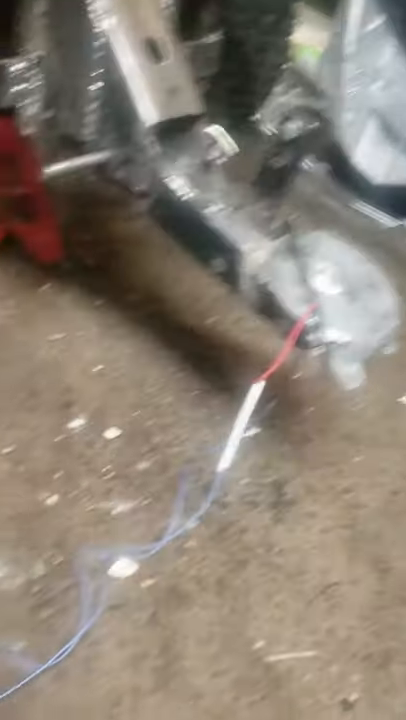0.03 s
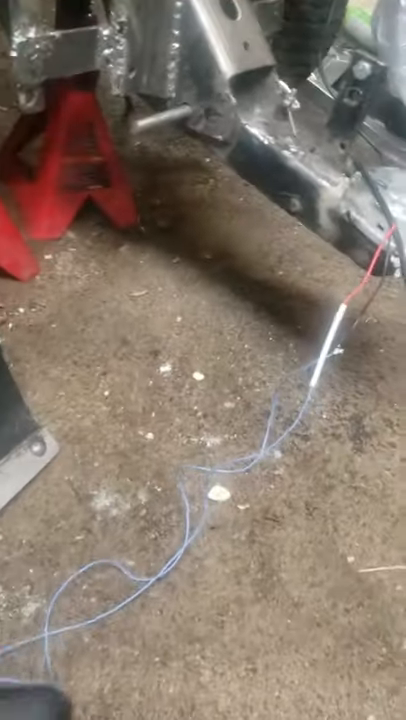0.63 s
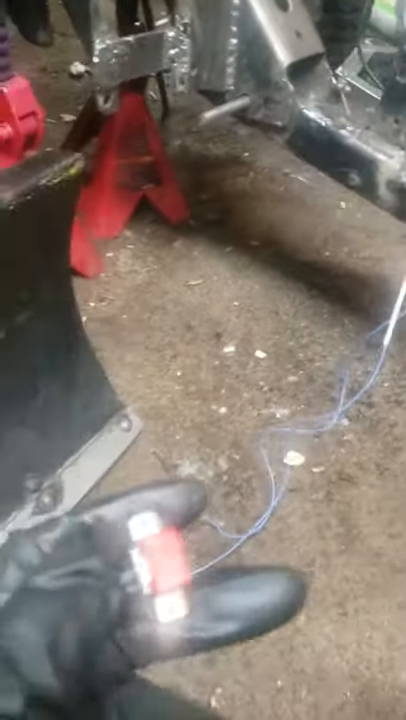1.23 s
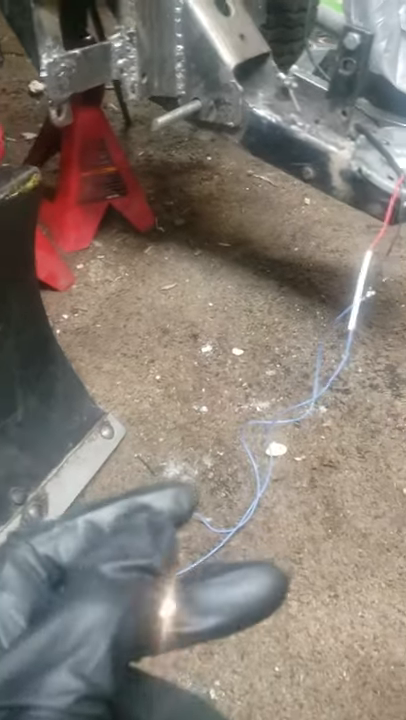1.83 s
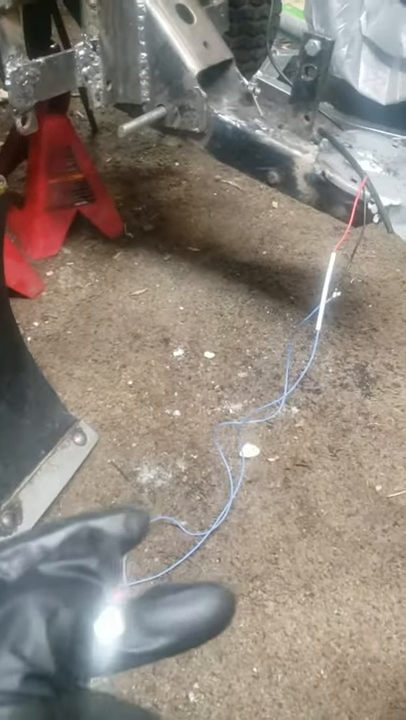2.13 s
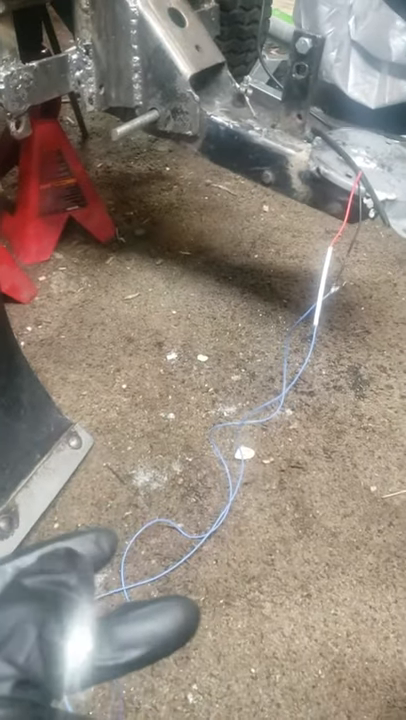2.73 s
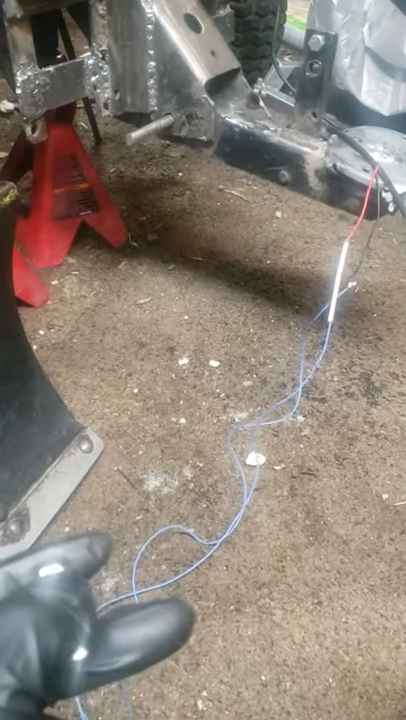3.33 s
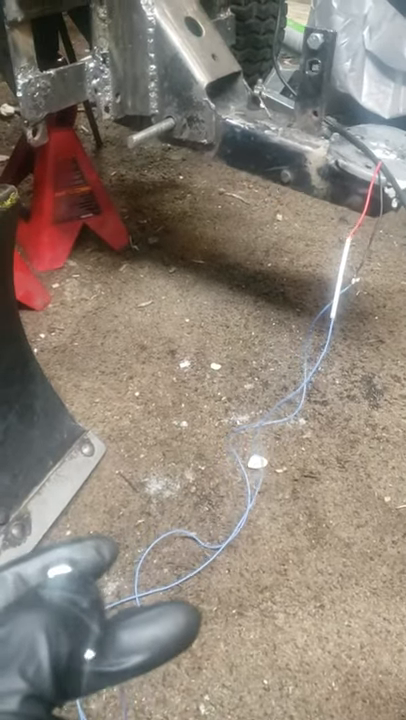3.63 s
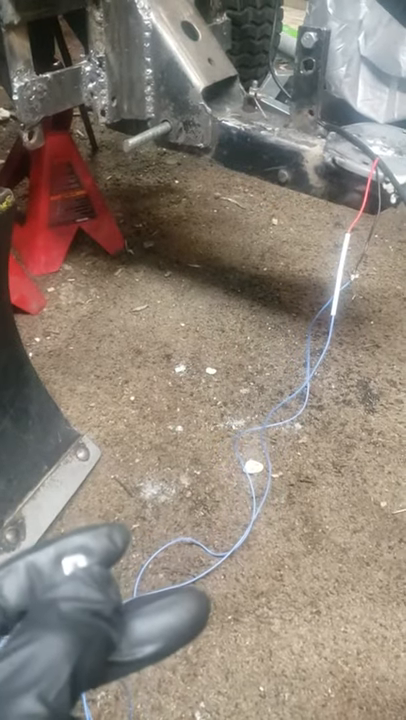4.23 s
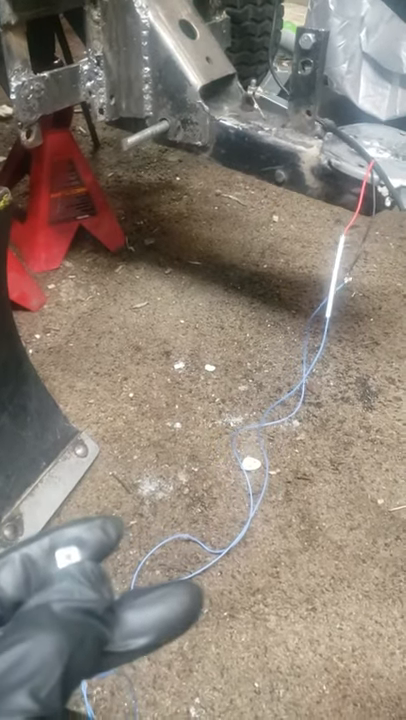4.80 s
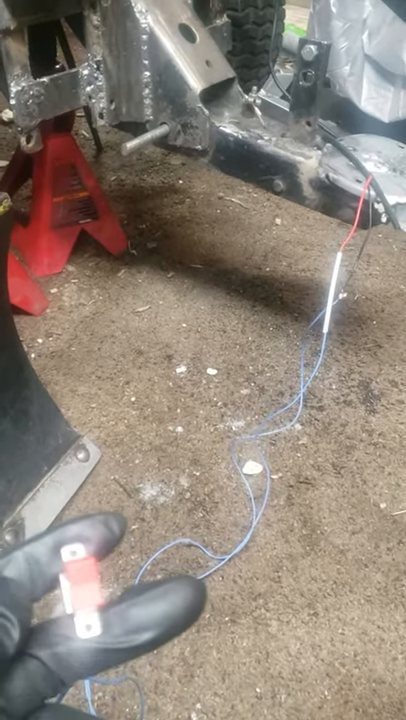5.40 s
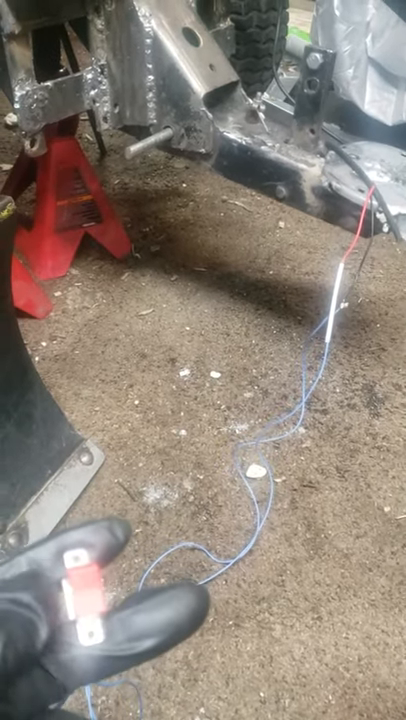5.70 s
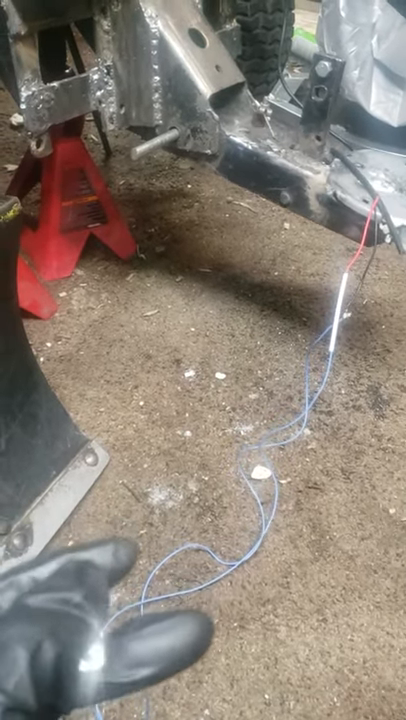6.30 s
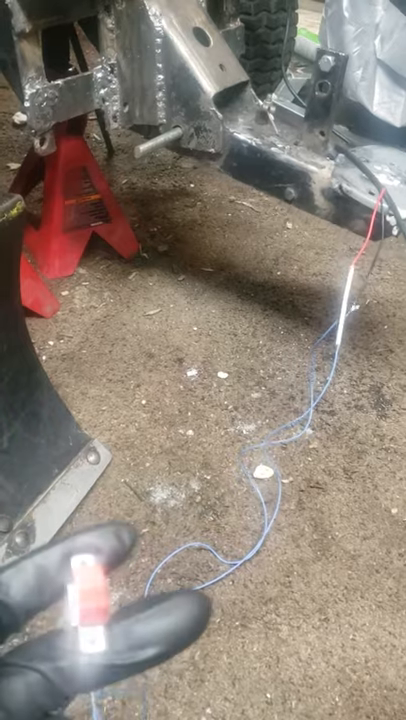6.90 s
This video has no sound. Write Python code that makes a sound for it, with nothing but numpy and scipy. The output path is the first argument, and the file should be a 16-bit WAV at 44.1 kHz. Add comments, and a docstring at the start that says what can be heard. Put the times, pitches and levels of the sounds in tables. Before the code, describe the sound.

For the first two seconds or so there is only faint glove and sleeve rustle, low handling rumble and a quiet hiss on a close, hand-held microphone. At about 2.4 seconds a plastic switch clicks and a small electric actuator starts, a buzzing, medium-pitched whine with a brushy rasp that rises slightly as it settles. It stops with a light click at 4 seconds. At 4.5 seconds another click sends the motor back, with a slightly different tone and a growing gear whirr. A sharp, louder click sounds over it at about 5.2 seconds, and the motor stops with a click at 6.2 seconds. At 6.5 seconds a small click and a brief rustle start a third run, a little higher and louder, which continues to the end at about 7 seconds. The workshop adds a short, slight reverberation.

```python
"""A workshop: a linear actuator on a steel frame runs out, back and out again from a hand-held rocker switch.
Its twelve-slot DC motor whines through the frame's resonances, the gears add shaft orders, and the
brushes rasp through the housing, swelling once a turn. The switch clicks at each press and release.
A glove and sleeve rustle near the two microphones, over handling rumble and a quiet hiss."""
import sys
import numpy as np
from scipy import signal
from scipy.fft import rfft, irfft, next_fast_len
from scipy.io import wavfile
from scipy.ndimage import map_coordinates

SR = 44100
rng = np.random.default_rng(int(sys.argv[2]) if len(sys.argv) > 2 else 0)


def dump(signal):
    """Clip the signal to [-1, 1] and save it as 16-bit WAV at the path in sys.argv[1]."""
    limited = np.clip(np.atleast_2d(signal).T, -1, 1)
    pcm = np.round(limited * 32767).astype(np.int16)
    wavfile.write(sys.argv[1], SR, pcm)


N = 306495
SLOTS = 12


def amp(db):
    """Decibels to gain."""
    return 10 ** (np.asarray(db) / 20)


def unit(x):
    """Scale to rms 1."""
    return x / np.sqrt(np.mean(x ** 2) + 1e-20)


def along(points, hz):
    """Interpolate (frequency [Hz], value) points on a log axis."""
    f, v = np.transpose(points)
    return np.interp(np.log(hz + 1), np.log(f + 1), v)


def lift(resonances, hz):
    """Summed gain [dB] of resonances at hz."""
    return sum(db / (1 + (2 * (hz - centre) / width) ** 2) for centre, width, db in resonances)


def swell(t, middle_s, half_s):
    """Gaussian rise and fall, peak 1."""
    return np.exp(-((t - middle_s) / half_s) ** 2)


def wobble(t, rate_hz):
    """Smooth random curve, knots at rate_hz."""
    return map_coordinates(rng.standard_normal(int(N * rate_hz / SR) + 4), [t * rate_hz], mode="mirror")


def filtered(x, response):
    """Apply a frequency response."""
    size = x.shape[-1]
    padded = next_fast_len(size + 8192)
    return irfft(rfft(x, padded) * response(np.fft.rfftfreq(padded, 1 / SR)), padded)[..., :size]


def noise(size, spectrum):
    """Coloured noise, rms 1."""
    return unit(filtered(rng.standard_normal(size), lambda hz: amp(along(spectrum, hz))))


def add(track, start_s, sound):
    """Mix a sound into a track."""
    part = track[round(start_s * SR):][:len(sound)]
    part += sound[:len(part)]


def ambient(spectrum, shared):
    """Stereo noise, partly common to both microphones; mid at rms 1."""
    # balance: (frequency [Hz], left minus right [dB])
    balance = [(60, -4.5), (200, -8), (700, 1.5), (1290, 6.5), (2400, 1), (4400, 17.5), (8000, 15),
               (15000, 3)]
    pair = np.sqrt(shared) * rng.standard_normal(N) + np.sqrt(1 - shared) * rng.standard_normal((2, N))
    pair = filtered(pair, lambda hz: amp(along(spectrum, hz) + np.outer([.5, -.5], along(balance, hz))))
    return pair / np.std(pair.mean(axis=0))


def hiss(level_db=-77.5):
    """Steady background hiss."""
    # (frequency [Hz], density [dB])
    spectrum = [(100, 2), (400, 1.5), (800, 0), (1000, 12.5), (1250, -7), (2800, -5.5), (4600, -9.5),
                (6500, -6), (8400, -23.5), (11000, -12), (13700, -3.5), (15500, -10)]
    return amp(level_db) * ambient(spectrum, shared=0.13)


def handling(rumble_db=-69.5):
    """Glove and sleeve rub as the arm moves; the hand-held microphones rumble and get bumped."""
    # arm movements: (middle [s], half length [s], glove [dB], sleeve [dB])
    rubs = [(0.333, 0.11, -63, -68.5), (.52, 0.23, -79, -74), (1.173, 0.29, -65, -75),
            (1.524, 0.18, -72.5, -84), (1.787, 0.18, -81.5, -75), (2.163, 0.12, -87, -77.5),
            (2.398, 0.028, -73, -90), (5.28, 0.049, -63, -85), (5.937, 0.27, -65.5, -86),
            (6.562, 0.045, -56.5, -90)]
    # hand bumps: (middle [s], half length [s], level [dB])
    bumps = [(0.502, 0.51, -61.5), (1.143, 0.18, -61.5), (1.704, 0.35, -66), (2.16, .03, -71),
             (2.44, 0.053, -58.5), (3.68, 0.031, -58), (4.136, 0.054, -63), (4.526, 0.042, -57),
             (5.273, .05, -59), (6.15, .05, -62)]
    # noise spectra: (frequency [Hz], density [dB])
    glove_spectrum = [(120, -1.5), (250, 2.5), (380, 3), (600, -7), (1200, -15.5), (2500, -22.5),
                      (6000, -48)]
    sleeve_spectrum = [(500, -4), (1500, -1.5), (2800, -6.5), (4500, 2), (6300, 2), (8400, -28.5),
                       (11000, -12), (13700, -4), (15500, -23)]
    rumble_spectrum = [(20, -22), (40, -9), (58, 2), (100, -2.5), (170, -9), (300, -20), (700, -39),
                       (2000, -67)]
    t = np.arange(N) / SR
    glove = sum(amp(db) * swell(t, s, half_s) for s, half_s, db, _ in rubs)
    sleeve = sum(amp(db) * swell(t, s, half_s) for s, half_s, _, db in rubs)
    bumping = sum(amp(db) * swell(t, s, half_s) for s, half_s, db in bumps)
    rumble = np.hypot(amp(rumble_db), bumping)
    return (glove * amp(2.5 * wobble(t, 35)) * ambient(glove_spectrum, shared=0.7)
            + sleeve * amp(1.1 * wobble(t, 40.1)) * ambient(sleeve_spectrum, shared=0.13)
            + rumble * amp(1.5 * wobble(t, 16)) * ambient(rumble_spectrum, shared=1.0))


def workshop(x):
    """Room reverberation at each microphone; treble dies first."""
    # room decay: (frequency [Hz], T60 [s])
    decay = [(200, 0.67), (1500, 0.26), (5000, 0.26), (13000, 0.18)]
    hz, t, bins = signal.stft(rng.standard_normal((2, SR // 2)), SR, nperseg=256)
    tail = signal.istft(bins * amp(-60 * t / along(decay, hz)[:, None]), SR, nperseg=256)[1]
    tail = np.pad(tail / np.linalg.norm(tail[0]), ((0, 0), (SR // 200, 0)))  # 5 ms pre-delay
    return signal.fftconvolve(x[None], tail, axes=1)[:, :N]


def microphones(x, room_db):
    """Direct sound plus room; on the right the direct sound is later and duller."""
    # balance of direct sound and of room: (frequency [Hz], left minus right [dB])
    direct_balance = [(200, -0.5), (380, 1.5), (700, 10.5), (1290, 10.5), (2380, 18), (4400, 35.5),
                      (8120, 33)]
    room_balance = [(300, -6), (700, -5.5), (1300, -2.5), (2400, 1.5), (4400, 8), (8000, 20)]
    # direct phase: (frequency [Hz], left lead [rad])
    lead = [(100, 0.14), (300, 0.49), (560, 2.58), (860, 1.78), (1460, 3.6), (1980, 5.35), (3700, 10.6)]
    pair = lambda right_gain: 2 * np.array([np.ones_like(right_gain), right_gain])
    right = lambda hz: amp(-along(direct_balance, hz)) * np.exp(-1j * along(lead, hz))
    direct = filtered(x, lambda hz: pair(right(hz)) / np.abs(1 + right(hz)))
    room = filtered(workshop(x), lambda hz: pair(amp(-along(room_balance, hz))))
    return direct + amp(room_db) * room


def switch(snap_db=-5, knock_db=-3, snap_t60_s=0.0093, knock_t60_s=0.0081, hold_s=0.0004, rise_s=0.00052):
    """Each contact snaps and knocks the plastic body that holds it."""
    # contacts and small knocks: (time [s], level [dB], knock [dB], snap brightness [dB])
    clicks = [(1.1811, -48, 8, -44), (2.188, -58.5, 7, -44), (2.4244, -22.5, -20, -16.5),
              (4.0259, -31.5, -6, -8), (4.4897, -27, -26, -13), (5.2477, -7.5, -38, -48),
              (6.2124, -19, -17, -44), (6.5007, -36, -27, -4)]
    # contact and body spectra: (frequency [Hz], density [dB])
    snap_spectrum = [(300, -43), (1200, -8.5), (3000, -4), (5200, 7.5), (7000, 1), (8500, -7), (13000, 4.5),
                     (15500, -12)]
    knock_spectrum = [(120, -4), (350, 10), (900, 1.5), (1800, -15), (3000, -17), (6000, -48)]
    track, t = np.zeros(N), np.arange(SR // 10) / SR
    for s, db, low_db, bright_db in clicks:
        tilt = lambda hz: amp((bright_db + 12.5) * np.clip(hz / 12000, 0, 1))
        snap = filtered(noise(len(t), snap_spectrum), tilt)
        snap *= amp(snap_db - 60 * np.maximum(t - hold_s, 0) / snap_t60_s)
        knock = noise(len(t), knock_spectrum) * amp(knock_db + low_db - 60 * t / knock_t60_s)
        add(track, s, amp(db) * (1 - np.exp(-t / rise_s)) * (snap + knock))
    return track


def whirr(t, off_s, end_db=-51.5, growth_db_per_s=7):
    """Gear noise grows as the rod nears home."""
    # gears: (frequency [Hz], density [dB])
    spectrum = [(250, -13), (450, -10), (800, -7), (1500, -28), (2300, -14), (2620, 2.5), (2800, 4.5),
                (3100, -25), (4500, -52), (11000, -61), (13200, -29), (15500, -23)]
    return amp(end_db + growth_db_per_s * np.minimum(t - off_s, 0)) * noise(len(t), spectrum)


def rasp(turns, going_out, swell_db, repeat, slot_db=2.5, fizz_hz=6940, fizz_db=1, points=860):
    """Brush and gear friction, partly alike each turn, swells per turn and slot and rings the housing."""
    # housing radiation: (frequency [Hz], gain [dB])
    housing = [(100, -15), (400, -17.5), (520, -6.5), (700, -2), (950, -8.5), (1700, -4.5), (2600, -1.5),
               (4000, -1), (6200, 1.5), (7300, -8.5), (8400, -20.5), (11000, -16), (13200, -7),
               (15500, -27)]
    # resonances and hollows by thrust direction: (centre [Hz], width [Hz], gain [dB])
    rings_out = [(1950, 320, 8), (4270, 300, 3.5), (5760, 50, 10)]
    rings_back = [(674, 150, 1), (1250, 500, 4.5), (2450, 390, 5), (4460, 160, -11), (5260, 54, 15),
                  (13000, 600, -0.5)]
    rings = rings_out if going_out else rings_back
    surface = unit(irfft(np.exp(2j * np.pi * rng.random(points // 2 + 1))))  # roughness of one turn
    repeating = map_coordinates(surface, [turns % 1 * points], mode="grid-wrap")
    friction = np.sqrt(repeat) * repeating + np.sqrt(1 - repeat) * rng.standard_normal(len(turns))
    per_turn = np.cos(2 * np.pi * turns)
    per_slot = np.cos(2 * np.pi * SLOTS * turns)
    contact = friction * amp(swell_db * per_turn + slot_db * per_slot)
    fizz = filtered(contact, lambda hz: hz > fizz_hz)  # brush sparking swells harder
    contact = contact - fizz + fizz * unit(amp(fizz_db * per_turn))
    return unit(filtered(contact, lambda hz: amp(along(housing, hz) + lift(rings, hz))))


def whine(t, turns, shaft_hz, going_out, waver_db=1.44, drift_cycles=0.05, edge_s=0.012):
    """Rotor tones, strongest at slot multiples, swell or sink as they cross the frame's resonances."""
    # tones: (shaft order, rounded in use [1], going out [dB], going back [dB])
    orders = [(5, -77.5, -73), (7, -81, -78.5), (9, -87, -83), (11, -75, -67), (12, -59.5, -67),
              (13, -69, -68.5), (14, -70, -86.5), (23, -69.5, -59.5), (24, -58.5, -56), (25, -64, -62),
              (26, -72.5, -69.5), (29, -70, -66.5), (36, -54, -65.5), (37, -67, -74), (48, -55, -57.5),
              (50, -67, -61), (60, -52, -63.5), (72.37, -52, -58), (84.4, -49.5, -81), (95.34, -57, -63),
              (106, -84, -58.5), (105, -61.5, -63)]
    # steel frame resonances and dead spots: (centre [Hz], width [Hz], gain [dB])
    frame = [(255.3, 16, 3.5), (581, 42, -5.5), (615.4, 14.5, 14), (661, 60, 6), (720.6, 42, 11),
             (1317, 100, 5), (1904, 97, 11), (2360, 75, 8), (3350, 120, -3), (4410, 88, 5.5),
             (4570, 118, -19), (5005, 160, 8), (5090, 170, 2), (5620, 120, 12)]
    # one tone leaps out: (start [s], end [s], shaft order [1], gain [dB])
    surges = [(3.319, 4.046, 24, 9.5), (4.537, 5.25, 24, 2), (3.32, 3.895, 36, 3.5), (3.89, 4.07, 12, 6),
              (5.36, 6.26, 12, 8), (6.577, 7.0, 24, 7.5), (6.623, 6.71, 36, 6), (6.885, 6.958, 36, 5)]
    total = np.zeros(len(t))
    for order, out_db, back_db in orders:
        order = round(order)
        tone_db = out_db if going_out else back_db
        surge_db = sum(db * np.clip(np.minimum(t - start_s, end_s - t) / edge_s, 0, 1)
                       for start_s, end_s, which, db in surges if which == order)
        level = amp(tone_db + lift(frame, order * shaft_hz) + surge_db + waver_db * wobble(t, 25))
        cycles = order * turns + rng.random() + drift_cycles * wobble(t, 9)
        total += level * np.sqrt(2) * np.sin(2 * np.pi * cycles)
    return total


def stroke(run, pitch, going_out, attack_s=0.012, brake_s=0.016, growth_db_per_s=1.1, uneven_db=0.77):
    """One motor run: the fluttering shaft settles to speed and drives both whine and rasp."""
    on_s, off_s, whine_db, rasp_db, swell_db, flutter_turns, repeat = run
    slot_hz, creep_hz_per_s, sag_hz, settle_s = pitch
    t = np.arange(round(on_s * SR), min(N, round((off_s + .2) * SR))) / SR
    shaft_hz = (slot_hz + creep_hz_per_s * (t - on_s) - sag_hz * swell(t, on_s, settle_s)) / SLOTS
    turns = np.cumsum(shaft_hz) / SR + flutter_turns * wobble(t, 130)
    attack = 1 - np.exp(-np.abs(t - on_s) / attack_s)
    release = np.exp(-np.maximum(t - off_s, 0) / brake_s)
    brush_db = rasp_db + growth_db_per_s * (t - (on_s + off_s) / 2) + uneven_db * wobble(t, 30)
    sound = amp(whine_db) * whine(t, turns, shaft_hz, going_out)
    sound += amp(brush_db) * rasp(turns, going_out, swell_db, repeat)
    if not going_out:
        sound += whirr(t, off_s)
    track = np.zeros(N)
    add(track, on_s, attack * release * sound)
    return track


def actuator():
    """The rod goes out, back and out again."""
    # motor runs: (on [s], off [s], whine [dB], rasp [dB], swell per turn [dB], flutter [turns],
    # repeating share of rasp [0-1])
    runs = [(2.435, 4.037, 0.34, -43.5, 2.5, 0.002, 0.4), (4.498, 6.216, -1, -43.5, 1.7, 0.0012, 0.4),
            (6.515, 7.0, 0.35, -40.5, 2, 0.002, 0.5)]
    # slot tone per run: (pitch [Hz], creep [Hz/s], starting sag [Hz], settling [s])
    pitches = [(605.3, 23, 23, .27), (609.7, 0.306, 14, .72), (649, 23, -6.5, .13)]
    return sum(stroke(run, pitch, going_out)
               for run, pitch, going_out in zip(runs, pitches, (True, False, True)))


def scene():
    """Actuator and switch in the room, over handling noise and hiss."""
    return microphones(actuator(), room_db=-15) + microphones(switch(), room_db=-9.5) + handling() + hiss()


def record(dry, top_hz=15800):
    """Brick-wall low-pass."""
    return filtered(dry, lambda hz: hz < top_hz)


dry = scene()
out = record(dry)
dump(out)
```